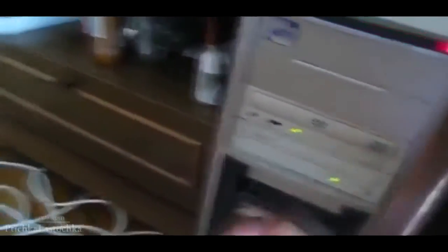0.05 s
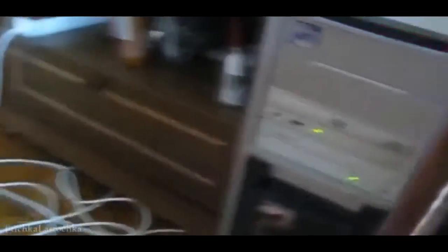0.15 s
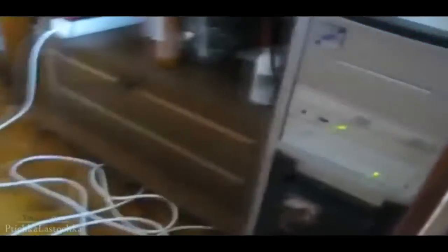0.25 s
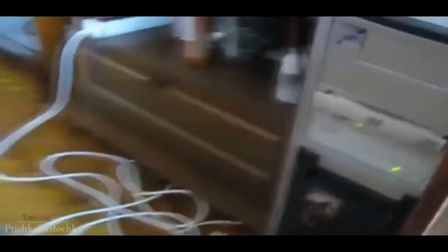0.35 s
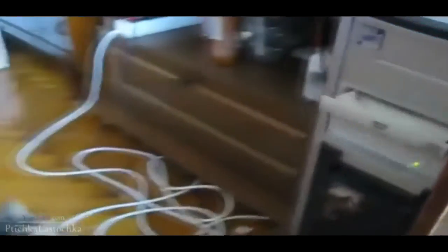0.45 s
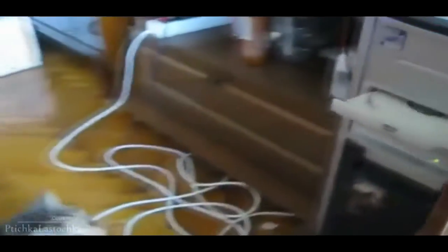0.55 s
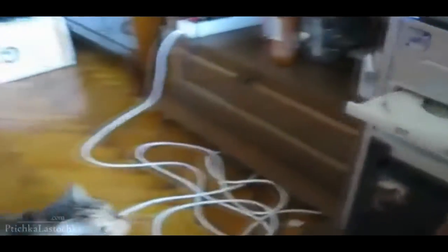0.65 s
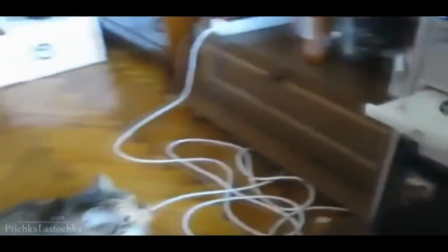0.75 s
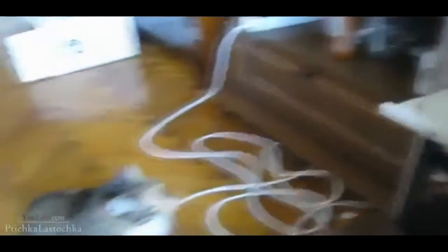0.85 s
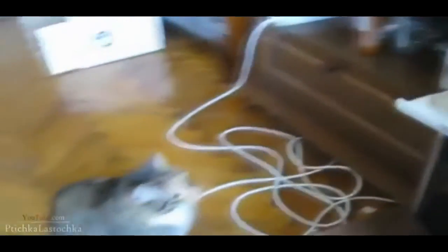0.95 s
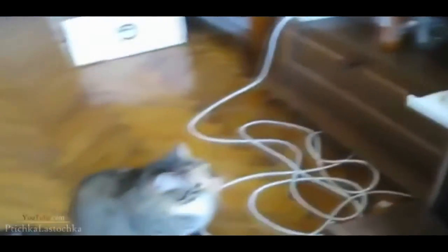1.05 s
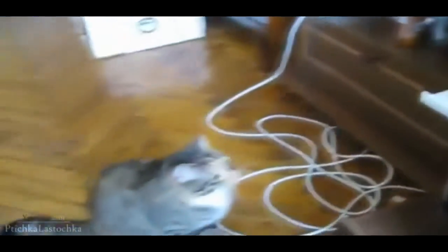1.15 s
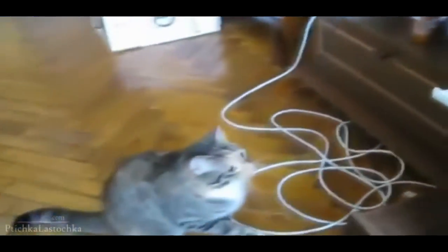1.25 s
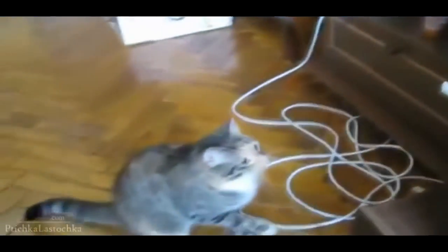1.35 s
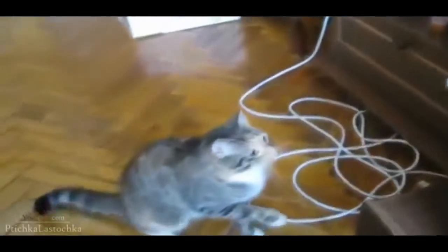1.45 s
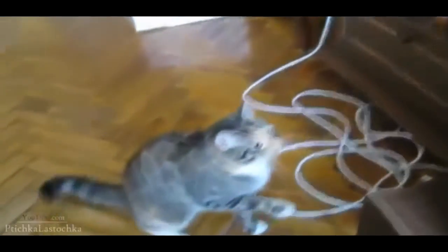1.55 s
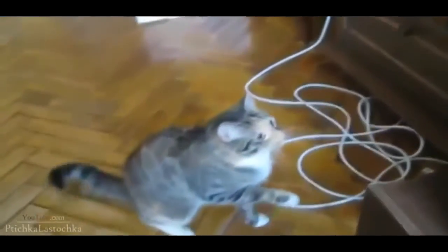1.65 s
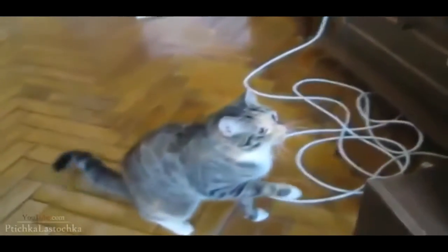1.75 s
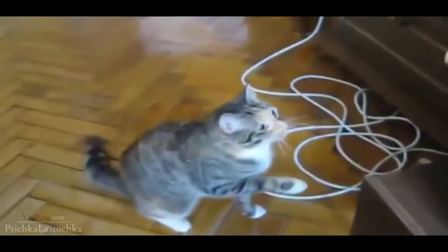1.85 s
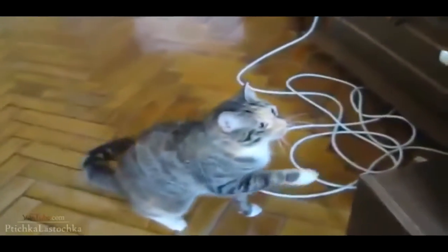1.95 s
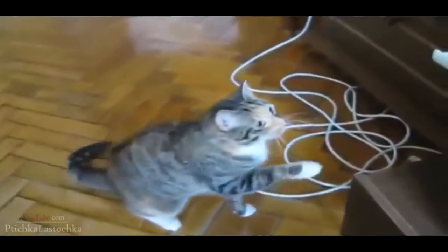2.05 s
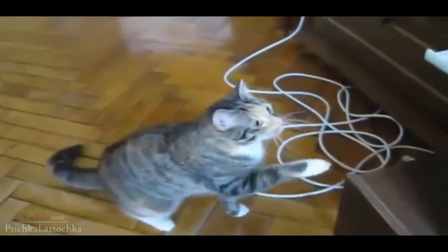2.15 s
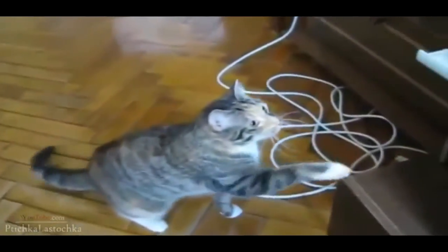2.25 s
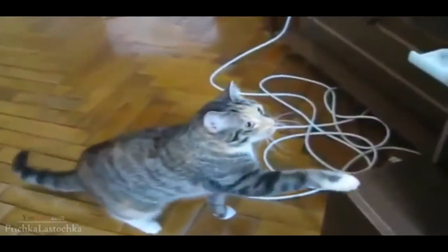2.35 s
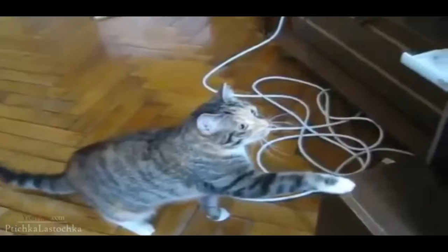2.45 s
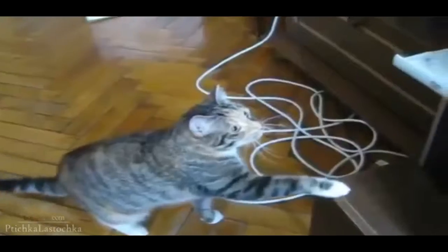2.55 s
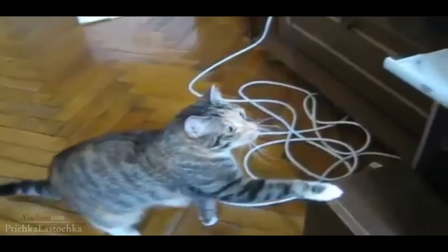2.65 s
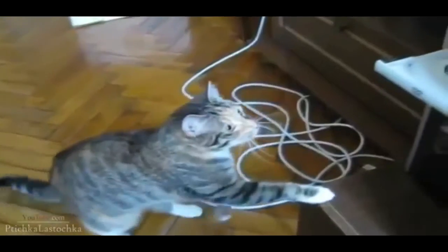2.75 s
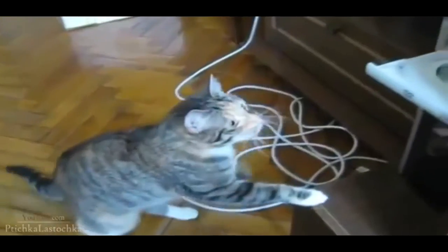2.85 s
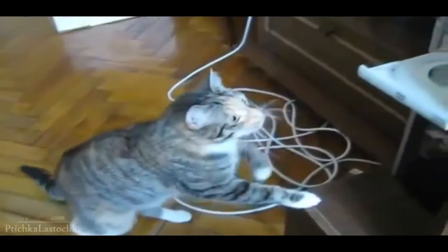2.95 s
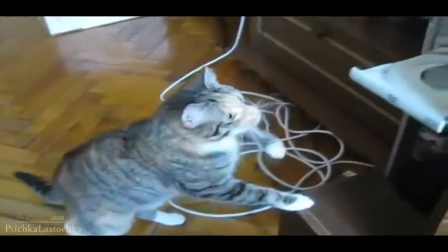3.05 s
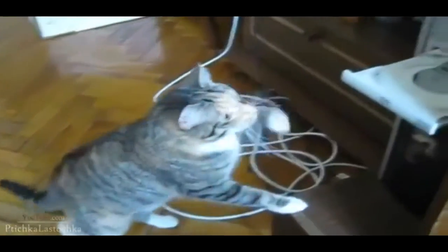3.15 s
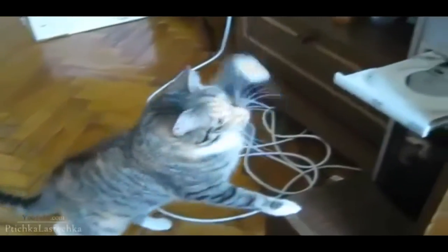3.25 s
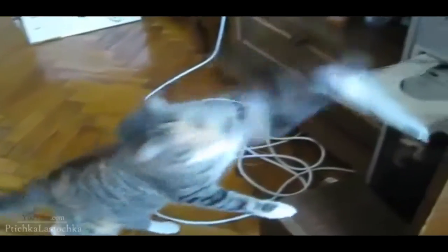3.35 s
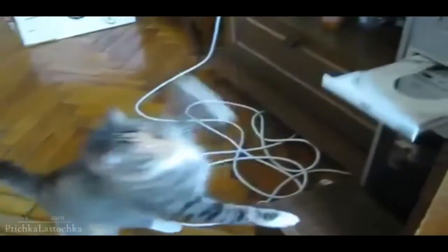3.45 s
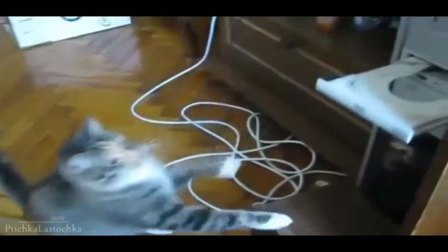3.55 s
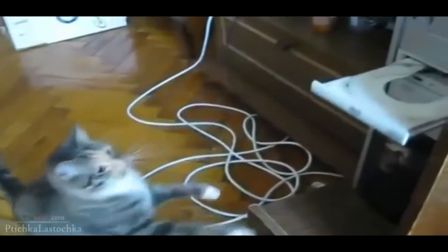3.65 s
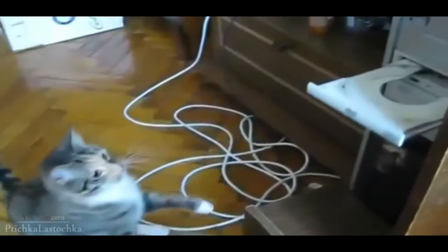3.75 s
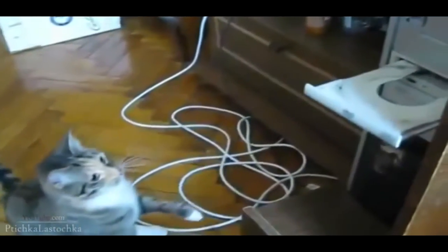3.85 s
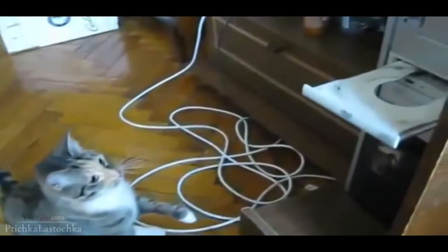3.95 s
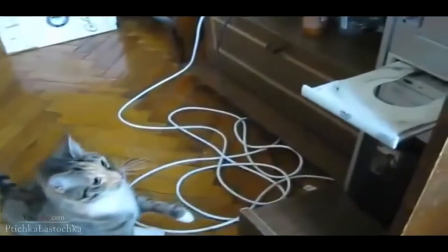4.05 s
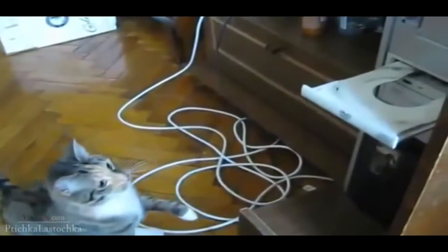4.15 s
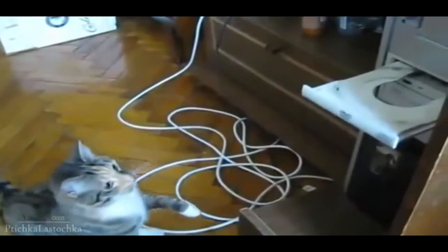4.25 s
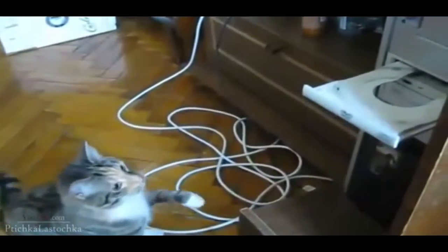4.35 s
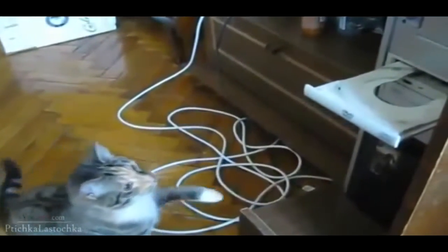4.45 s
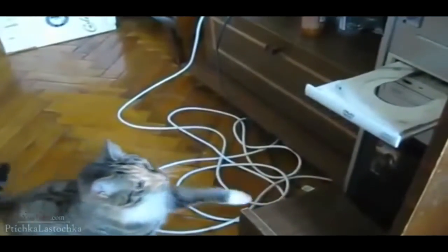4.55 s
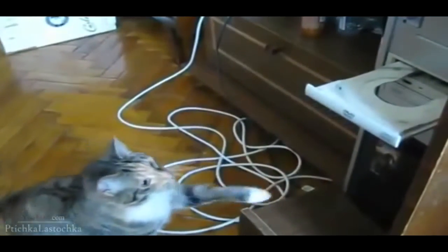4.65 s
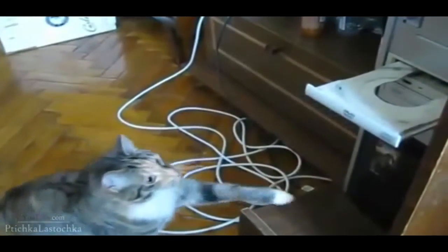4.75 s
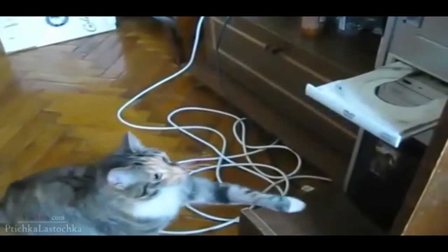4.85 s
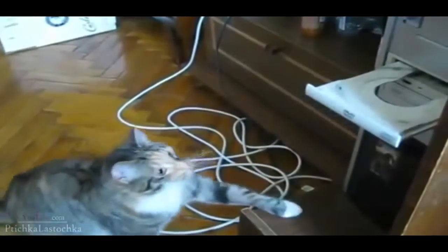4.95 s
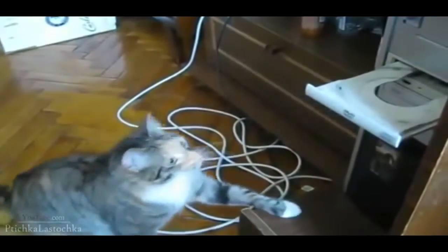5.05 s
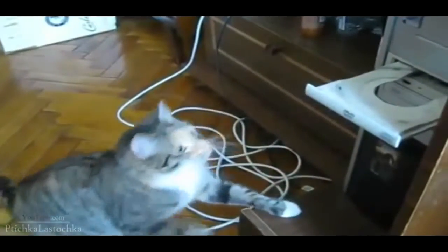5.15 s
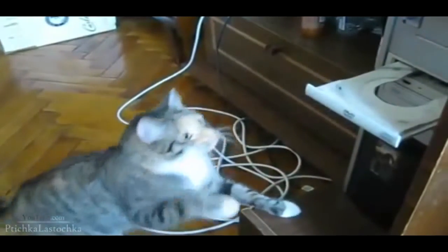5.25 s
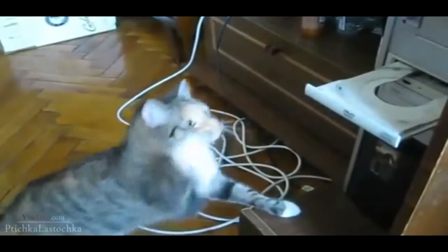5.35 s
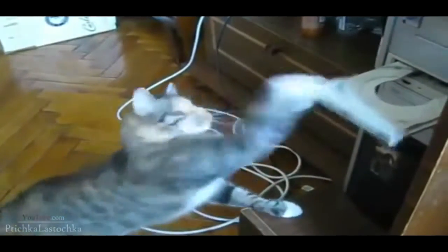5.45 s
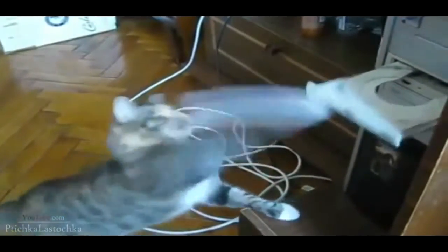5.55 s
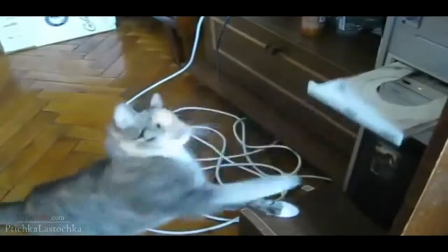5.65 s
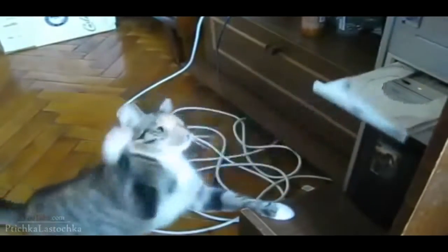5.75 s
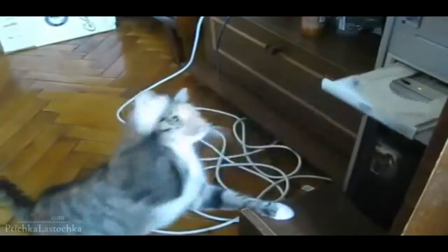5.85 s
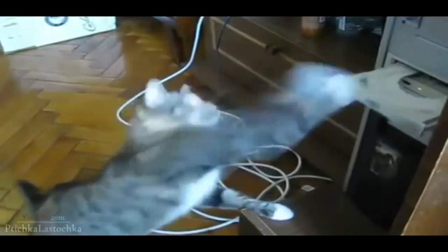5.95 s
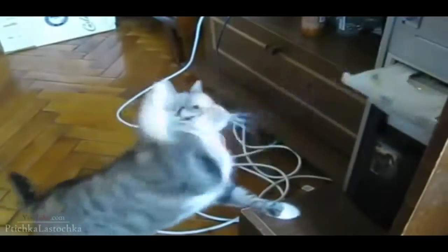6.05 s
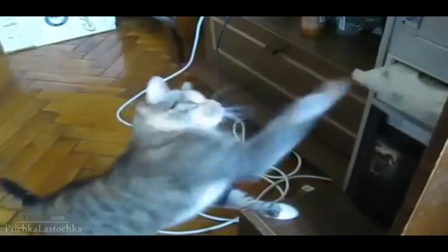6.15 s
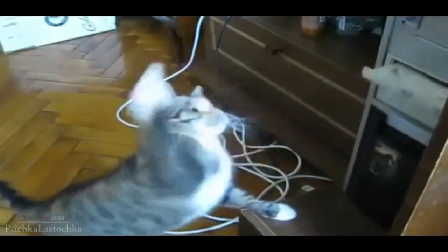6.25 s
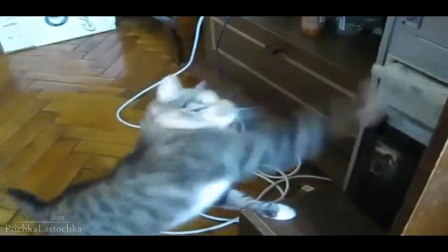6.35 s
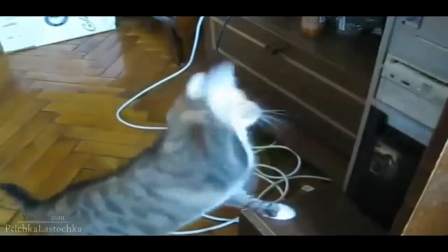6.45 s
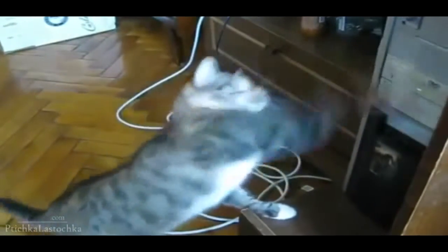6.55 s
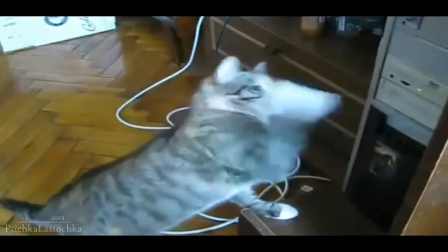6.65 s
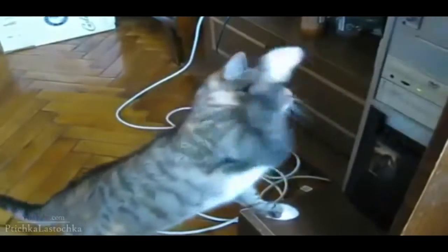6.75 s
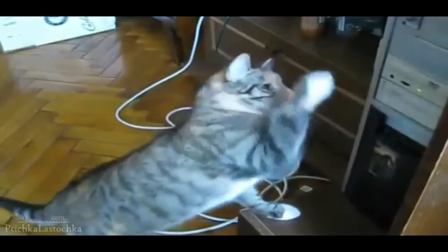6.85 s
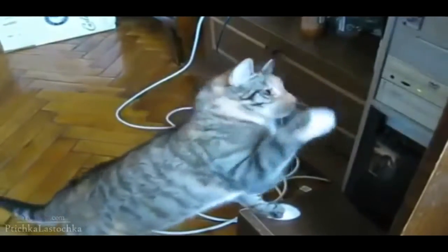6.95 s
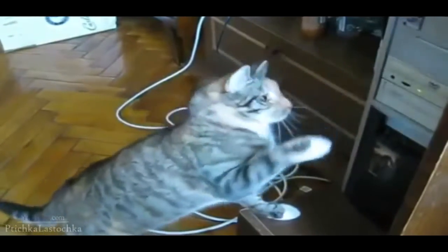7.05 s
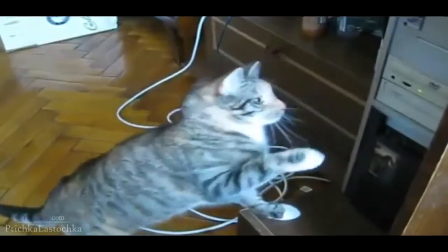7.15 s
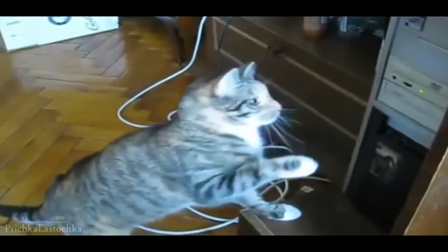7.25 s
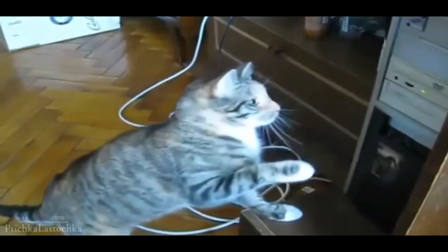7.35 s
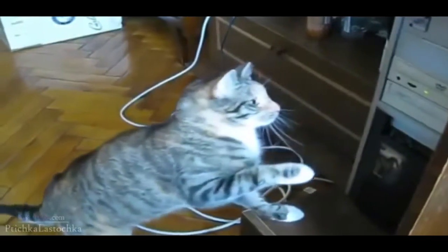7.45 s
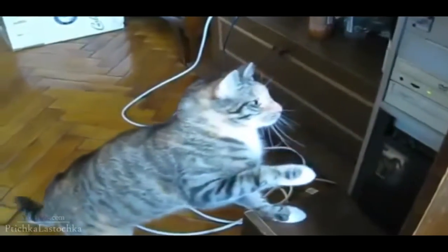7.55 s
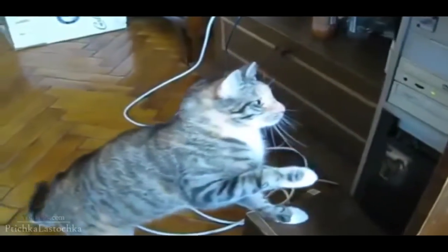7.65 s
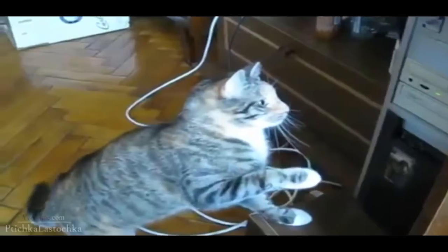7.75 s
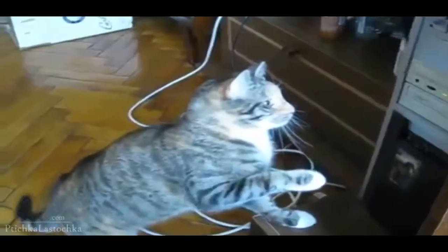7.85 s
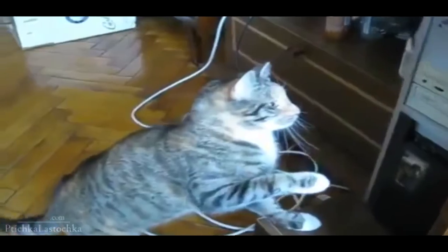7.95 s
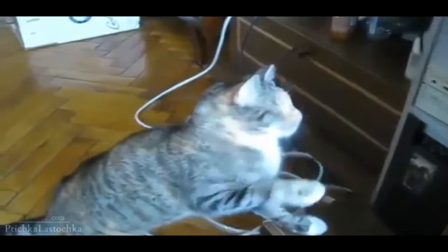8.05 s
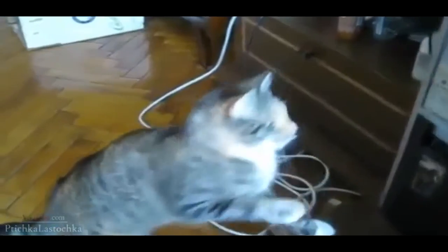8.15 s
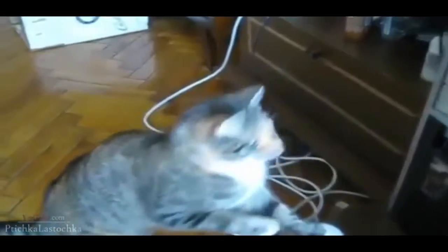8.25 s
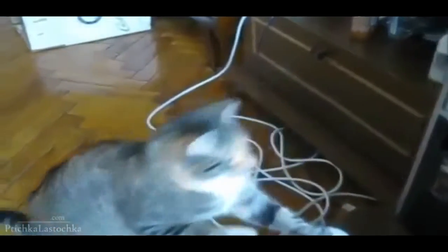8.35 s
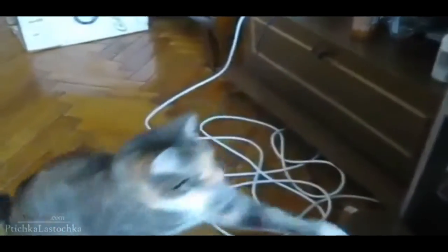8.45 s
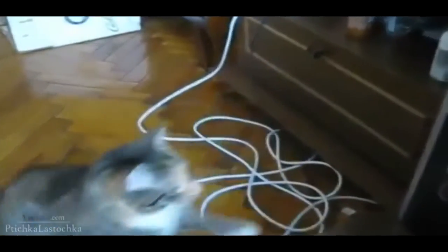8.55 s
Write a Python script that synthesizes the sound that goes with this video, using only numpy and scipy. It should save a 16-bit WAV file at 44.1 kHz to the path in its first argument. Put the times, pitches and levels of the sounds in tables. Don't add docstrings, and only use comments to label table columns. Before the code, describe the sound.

Close, slightly rough small-microphone sound: constant fan noise with a faint steady tone, latch clicks and a brief gear whine dropping in pitch. Fan hiss alone follows, then one sharp plastic smack with quick rattling rebounds. Another lull, a lone strong pop, then a flurry of loud cracks and sliding clatter, ending in a duller slam. Fans continue in the live room, with light floor scuffs.

```python
import sys
import numpy as np
from scipy import signal
from scipy.fft import rfft, irfft
from scipy.io import wavfile
from scipy.ndimage import uniform_filter1d

SR = 44100
rng = np.random.default_rng(int(sys.argv[2]) if len(sys.argv) > 2 else 0)


def inscribe(sig):
    pcm = np.round(np.clip(np.atleast_2d(sig).T, -1, 1) * 32767)
    wavfile.write(sys.argv[1], SR, pcm.astype(np.int16))


def voltage_ratio(decibels):
    exponent = np.asarray(decibels, float) / 20
    return 10 ** exponent


N = 380141

# frequency_hz, density_db
PLASTIC = [(35, -53), (60, -28), (233, -7), (354, -9.5), (566, -4), (822, -5), (4320, -4), (6580, -11),
           (7940, -16), (9350, -17), (13300, -28.5), (14900, -30), (16000, -66)]
# frequency_hz, level_db, t60_s
TRAY_MODES = [(3200, 9, .03), (3640, 6, .03), (4320, -22, .05), (4350, -19, .04), (5000, -29, .04),
              (6230, -24, .04), (6300, -1, .03), (10240, -25, .04)]
# time_s, level_db
VENT_LEVEL = [(0, -59.5), (.45, -57.5), (1.4, -72), (1.75, -90), (1.88, -62), (2.1, -92), (3.5, -72),
              (5.6, -81), (7.1, -65.5), (8.62, -62.5)]


def evened(x):
    return x / np.sqrt(np.mean(x ** 2) + 1e-20)


def add(mix, start_s, sound):
    part = mix[round(start_s * SR):][:len(sound)]
    part += sound[:len(part)]


def colour(x, points):
    f, db = np.transpose(points)
    hz = np.fft.rfftfreq(len(x), 1 / SR)
    gain_db = np.interp(np.log(hz + 1), np.log(f + 1), db)
    return irfft(rfft(x) * voltage_ratio(gain_db), len(x))


def bands(x, edges_hz):
    hz = np.fft.rfftfreq(len(x), 1 / SR)
    below = [0] + [1 / (1 + (hz / edge) ** 8) for edge in edges_hz] + [1]
    spectrum = rfft(x)
    return [evened(irfft(spectrum * (upper - lower), len(x))) for lower, upper in zip(below, below[1:])]


def resonate(x, hz, width_hz):
    turn = np.exp(2j * np.pi * np.cumsum(hz * np.ones(len(x))) / SR)
    r = np.exp(-np.pi * width_hz / SR)
    smooth = signal.lfilter([1 - r], [1, -r], x / turn)
    return 2 * (turn * smooth).real


def ring(hz, t60, t):
    return voltage_ratio(-60 * t / t60) * np.sin(2 * np.pi * hz * t)


def fans():
    # frequency_hz, density_db
    hiss_spectrum = [(12, -39), (20, -6), (168, -3.5), (574, -5), (923, -1.5), (1000, -5.5), (1220, -2.5),
                     (1860, -7), (2260, -5.5), (2460, -7.5), (6720, -18.5), (7950, -26), (10800, -24.5),
                     (14700, -33), (16000, -64)]
    # time_s, level_db
    hiss_level = [(0, -41.5), (.45, -41), (1.5, -44.5), (8.62, -44)]
    # frequency_hz, width_hz, level_db
    case_modes = [(840, 40, -17), (931, 60, -15), (1230, 80, -11), (1730, 100, -11), (2260, 70, -11),
                  (4520, 80, -23)]
    t = np.arange(N) / SR
    air = rng.standard_normal((2, N))
    case = 0
    for hz, width_hz, db in case_modes:
        sung = resonate(resonate(air[1], hz, width_hz), hz, width_hz)
        case = case + voltage_ratio(db) * evened(sung)
    turned_db = np.interp(t, *np.transpose(VENT_LEVEL)) + 70
    blade = voltage_ratio(-60 - 0.37 * turned_db) * np.sqrt(2) * np.sin(2 * np.pi * 931.5 * t)
    hiss = evened(colour(air[0], hiss_spectrum))
    return voltage_ratio(np.interp(t, *np.transpose(hiss_level))) * (hiss + case) + blade


def vent():
    air = resonate(resonate(rng.standard_normal(N), 9500.0, 2500.0), 9500.0, 2500.0)
    air = air + 1.3 * resonate(air, 9570.0, 150.0) + 1.2 * resonate(air, 12000.0, 120.0)
    return voltage_ratio(np.interp(np.arange(N) / SR, *np.transpose(VENT_LEVEL))) * evened(air)


def knocks(mix):
    # start_s, peak_db, ring_hz, t60_s
    knock_rows = [(0.0012, -24, 1670, 0.03), (0.496, -20, 1230, 0.051), (0.509, -30.5, 267, 0.34),
                  (0.52, -13.5, 10330, 0.015), (.565, -30.5, 530, 0.26), (0.694, -24, 2840, 0.083),
                  (.712, -26, 2900, 0.059), (.712, -28, 2270, .08), (3.6215, -6, 4700, 0.027),
                  (3.621, -12, 1540, 0.022), (3.6226, -17, 4300, 0.023), (3.6227, -13, 1290, 0.03),
                  (3.72, -39, 75, 0.75), (3.74, -40, 140, 0.6), (3.72, -32.5, 262, 0.41),
                  (5.76, -39, 64, .4), (5.74, -34, 174, 0.44), (5.949, -40.5, 164, 0.75),
                  (6.2285, -4, 2600, 0.018), (6.6102, -2.5, 2400, 0.026), (6.792, -2.5, 680, 0.013),
                  (6.792, -22, 1070, 0.1), (6.8163, -1, 1080, 0.023), (6.8161, 2.5, 1960, 0.018),
                  (6.86, -28.5, 270, 0.38), (7.798, -33, 1740, 0.072), (7.797, -39, 2250, 0.15),
                  (8.556, -28.5, 1740, 0.045), (8.555, -38, 2300, 0.066)]
    t = np.arange(12000) / SR
    for start_s, db, hz, t60 in knock_rows:
        add(mix, start_s, voltage_ratio(db) * ring(hz, t60, t) * (1 - np.exp(-t * hz)))


def shaking(t):
    # start_s, strength_db, gain_recovery_s, dullness_db, damping_factor
    jolts = [(0.496, -30, 0.027, 5, 1.3), (.558, -28, .005, 5.5, 0.93), (.69, -35.5, .005, 2, 0.58),
             (3.62, -13.5, 0.12, 0.5, 0.95), (5.707, -17.5, 0.061, 0, 0.56), (5.843, -12.5, 0.13, -2, 0.86),
             (5.98, -23, 0.0089, -9.5, 4.8), (6.228, -10, 0.096, 0, 1.28), (6.396, -17, 0.034, -1, 2.1),
             (6.46, -17.5, 0.059, 3, 1.18), (6.61, -18.5, 0.016, -1.5, 2.1), (6.67, -21.5, 0.048, 2, 0.94),
             (6.789, -31.5, .005, 13, 0.82), (6.815, -14.5, 0.067, 5, 1.42)]
    # start_s, end_s, level_db, dullness_db
    slides = [
        (0.444, .5, -41.5, 6),
        (.6, 1.33, -41.5, -2.5),
        (1.328, 1.485, -49.5, 0),
        (6.04, 6.8, -38.5, 9),
    ]
    slide_band_db = (-10, -5, -1.9, -15)
    # level (dB), share of dullness, dying (dB per s)
    level_db, dull_share = (-9.5, -4.5, -0.4, -13.5), (0.61, 0.73, -0.4, -0.37)
    dying_db_per_s, recover_db_per_s = (68, 86.4, 100, 141), 141
    power, duck_db = np.zeros((4, len(t))), np.zeros(len(t))
    for start_s, db, recovery_s, dull_db, damping in jolts:
        age = np.maximum(t - start_s, 0)
        first_db = db + np.add(level_db, np.multiply(dull_share, dull_db))
        jolt_db = first_db[:, None] - damping * np.outer(dying_db_per_s, age)
        power += (t > start_s) * voltage_ratio(2 * jolt_db)
        dip_db = recover_db_per_s * np.minimum(age - recovery_s, 0)
        duck_db = np.minimum(duck_db, (t > start_s) * dip_db)
    for start_s, end_s, db, dull_db in slides:
        sliding = (t > start_s) & (t < end_s)
        band_db = db + np.multiply(dull_share, dull_db) + slide_band_db
        power += sliding * voltage_ratio(2 * band_db)[:, None]
    return np.sqrt(abs(uniform_filter1d(power * voltage_ratio(2 * duck_db), 8, axis=1)))


def shudder():
    # frequency_hz, width_hz, level_db
    body_modes = [(268, 37, -6), (561, 93, 0), (1097, 22, 8), (1800, 26, 6.5), (2100, 32, -15),
                  (2480, 37, -6)]
    t = np.arange(N) / SR
    ticks_per_s = 1200
    ticks = voltage_ratio(3.6 * np.minimum(rng.exponential(1, N), 4)) * (rng.random(N) < ticks_per_s / SR)
    dying = voltage_ratio(-120 * np.arange(1500) / SR / 0.03)
    power = abs(signal.oaconvolve(ticks ** 2, dying)[:N])
    grit = evened(np.sqrt(power / power.mean() + 0.9) * rng.standard_normal(N))
    tray = sum(voltage_ratio(db) * resonate(grit, hz, 130.0) for hz, db, _ in TRAY_MODES)
    body = sum(voltage_ratio(db) * resonate(grit, hz, width_hz) for hz, width_hz, db in body_modes)
    parts = bands(colour(grit + 0.3 * tray + 0.6 * body, PLASTIC), (1200, 2800, 7900))
    coarse = t[::44]
    return sum(np.interp(t, coarse, level) * part for level, part in zip(shaking(coarse), parts))


def strike(start_s, peak_db, hz, thud_db, fizz_db, t60, rise_s, ringing):
    t = np.arange(6000) / SR
    thud, crack, fizz = bands(colour(rng.standard_normal(len(t)), PLASTIC), (2500, 7900))
    crack = evened(crack + 0.5 * resonate(crack, hz, 2700.0))
    detune = rng.uniform(1.0, 1.05, len(TRAY_MODES))
    modes = sum(voltage_ratio(db) * ring(f * d, 0.4 * t60, t) for (f, db, _), d in zip(TRAY_MODES, detune))
    tones = 0.36 * modes + 4.0 * ring(hz, 0.76 * t60, t)
    body = crack * voltage_ratio(-60 * t / t60) + ringing * tones
    thud = voltage_ratio(thud_db - 60 * t / (1.96 * t60)) * thud
    fizz = voltage_ratio(fizz_db - 60 * t / (0.92 * t60)) * fizz
    return start_s, voltage_ratio(peak_db) * (body + thud + fizz) * (1 - np.exp(-t / rise_s))


def rattles(mix):
    # start_s, peak_db, ring_hz, thud_db, fizz_db
    latch = [(0.45, -32, 3000, -11, -23), (0.4952, -28.5, 1570, 9.5, -15), (0.506, -31, 5900, -5, 6),
             (0.5172, -15, 4650, -3, -11), (0.5596, -13.5, 1570, -13, -30), (0.5718, -16, 1900, -2.5, -25),
             (0.6107, -24, 3100, -2, -26), (0.6193, -20.5, 1950, -7, -27), (0.692, -21, 5340, -20, -32),
             (0.7135, -28, 2930, -13, -32), (0.7653, -31, 2520, 6, -25), (1.295, -30.5, 2650, 0, -34)]
    bounces = [
        (3.6278, -14.5, 5000, -24, 0),
        (3.6721, -20, 3860, -11, -13),
        (3.72, -8, 4270, -14, -12),
        (3.7707, -7, 4060, -19, -20),
        (3.825, -14.5, 3080, -9.5, -12),
        (3.8878, -23, 2340, -13, -26),
        (3.937, -32, 3820, 1, -22),
        (3.9754, -31, 3400, -10, -25),
        (4.0175, -30, 3330, -6, -28),
        (4.0744, -36, 1730, -23.5, -22),
    ]
    clatter = [(5.7316, -3, 4680, -21, -13), (5.7572, -14, 3200, -21, -12), (5.778, -10, 3520, -11.5, -24),
               (5.825, -4.5, 3920, -12.5, -19), (5.9374, -8.5, 3060, -9, -24), (5.98, -7, 3200, -18, -15),
               (6.024, -6, 2800, -16, -19), (6.0845, -28, 4130, -12, -12), (6.1065, -15.5, 2450, -10, -18),
               (6.13, -21, 3700, -9, -29), (6.149, -20.5, 2580, -5, -29), (6.167, -17.5, 3480, -6, -32),
               (6.178, -17, 3030, -8, -20), (6.1852, -16.5, 2420, -6.5, -20), (6.218, -20, 2500, -6, -35),
               (6.414, -8, 1760, -17, -10), (6.5135, -14.5, 2880, -2, -29), (6.634, -27, 4610, -16, -12),
               (6.7, -20, 3440, -19, -29), (6.771, -39, 5000, -9, -6), (6.795, -33, 5000, -11, -3),
               (6.8373, -10.5, 3580, -8, -10)]
    for row in latch + bounces + clatter:
        add(mix, *strike(*row, t60=0.045, rise_s=0.0006, ringing=0.25))


def whistle(rows, width_hz):
    s, hz, db = np.transpose(rows)
    t = np.arange(s[0], s[-1], 1 / SR)
    pitch = np.interp(t, s, hz)
    blurred = evened(resonate(rng.standard_normal(len(t)), pitch, width_hz))
    wander = uniform_filter1d(uniform_filter1d(rng.standard_normal(len(t)), 700), 700)
    stutter_db = 1.5 * evened(wander)
    tone = 1.2 * np.sin(2 * np.pi * np.cumsum(pitch) / SR) + 0.8 * blurred
    return s[0], voltage_ratio(np.interp(t, s, db) + stutter_db) * tone * signal.windows.tukey(len(t), 0.1)


def motor(mix):
    # time_s, pitch_hz, level_db
    main_gear = [(.6, 5300, -50), (.69, 5330, -40), (.715, 4700, -43), (.74, 4050, -42.5), (.78, 3450, -44),
                 (.85, 3030, -46), (1.12, 2990, -47.5), (1.25, 2780, -48), (1.33, 2600, -52)]
    upper_partial = [(.98, 4850, -60), (1.2, 5500, -58), (1.23, 5620, -48), (1.28, 5600, -51)]
    rack_tone = [(1.0, 3750, -52), (1.15, 3680, -52), (1.3, 3480, -51)]
    add(mix, *whistle(main_gear, width_hz=60))
    add(mix, *whistle(upper_partial, width_hz=90))
    add(mix, *whistle(rack_tone, width_hz=70))


def squeak(mix):
    # time_s, pitch_hz, level_db
    squeak_curve = [(1.92, 14100, -84), (1.95, 14500, -78), (1.98, 14600, -76), (2.02, 13600, -75),
                    (2.06, 13050, -74), (2.11, 13300, -74), (2.145, 13000, -78)]
    add(mix, *whistle(squeak_curve, width_hz=25.0))


def paw_blows(mix):
    # start_s, peak_db, ring_hz, thud_db, fizz_db
    blow_rows = [
        (3.6214, 7.5, 4510, -24.5, -20),
        (5.7073, 6.5, 4150, -23, -16.5),
        (5.8417, 7, 4160, -25, -12),
        (6.2294, 6, 4250, -14.5, -14.5),
        (6.3941, 5.5, 4120, -13.5, -9.5),
        (6.6103, 5.5, 3200, -21, -13),
        (6.816, 2, 1710, -5, -33),
    ]
    for row in blow_rows:
        add(mix, *strike(*row, t60=0.022, rise_s=0.000037, ringing=0.19))


def pop(start_s, peak_db):
    t = np.arange(-20, 600) / SR
    push = np.where(t < 0, np.exp(t / 0.00004), np.exp(-t / 0.00019))
    back = (t > 0) * (np.exp(-t / 0.0015) - np.exp(-t / 0.00092))
    pressure = np.convolve(push - 0.29 * back, np.hanning(7) / 3, "same")
    return start_s - 20 / SR, voltage_ratio(peak_db) * pressure


def pops(mix):
    # start_s, peak_db
    pop_rows = [
        (3.6212, -8.5),
        (5.4592, 2.5),
        (5.7075, -33),
        (6.2302, -6),
        (6.3947, -7),
        (6.6103, -31),
    ]
    for row in pop_rows:
        add(mix, *pop(*row))


def scuffs(mix):
    # time_s, level_db
    scuff_curves = [
        [(7.78, -60), (7.8, -48), (7.88, -49), (7.95, -62)],
        [(8.5, -52), (8.56, -42), (8.6, -44), (8.62, -46)],
    ]
    for rows in scuff_curves:
        s, db = np.transpose(rows)
        t = np.arange(s[0], s[-1], 1 / SR)
        brush = resonate(resonate(rng.standard_normal(len(t)), 1550.0, 1600.0), 1550.0, 1600.0)
        add(mix, s[0], voltage_ratio(np.interp(t, s, db)) * evened(brush))


def room(x):
    # frequency_hz, t60_s
    room_decay = [(200, 0.23), (1000, 0.61), (4000, 0.68), (12000, 0.15)]
    hz, t, z = signal.stft(rng.standard_normal(SR // 2), SR, nperseg=256)
    t60 = np.interp(hz, *np.transpose(room_decay))[:, None]
    tail = signal.istft(z * voltage_ratio(-60 * t / t60), SR, nperseg=256)[1]
    tail = np.concatenate([np.zeros(150), tail])
    return signal.fftconvolve(x, tail / np.linalg.norm(tail))[:N]


def scene():
    hard, light, rest = np.zeros((3, N))
    knocks(rest)
    rattles(light)
    motor(rest)
    squeak(rest)
    paw_blows(hard)
    struck = voltage_ratio(-6.0) * hard + voltage_ratio(-5.5) * light + rest
    mix = struck + voltage_ratio(-20.0) * room(struck) + fans() + vent() + shudder()
    pops(mix)
    scuffs(mix)
    return mix[None]


def roll_off(x):
    return signal.sosfilt(signal.butter(12, 16470, fs=SR, output="sos"), x)


def record(dry):
    # frequency_hz, gain_db
    recorder_response = [(15, -6), (30, 0), (6900, 0), (7600, -5), (7900, -27), (8200, -5), (8800, 0),
                         (15100, 0), (15500, -13), (16600, -28)]
    limited = 0.97 * np.tanh(dry[0] / 1.4)
    heard = colour(limited, recorder_response)[None]
    return roll_off(heard)


dry = scene()
out = record(dry)
inscribe(out)
```